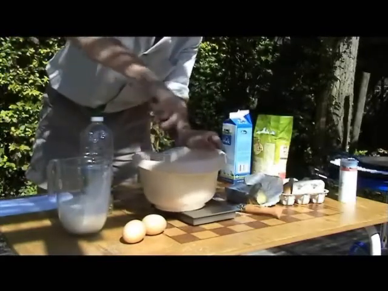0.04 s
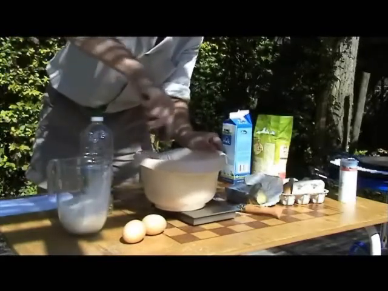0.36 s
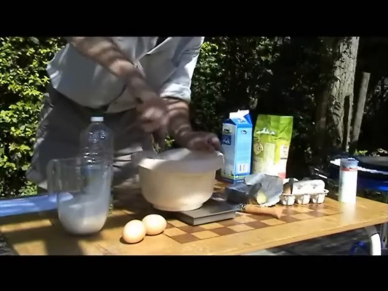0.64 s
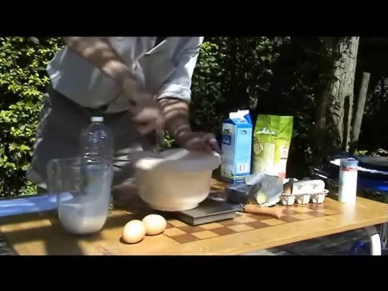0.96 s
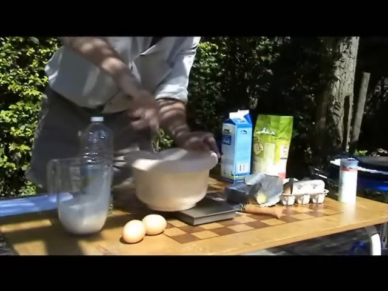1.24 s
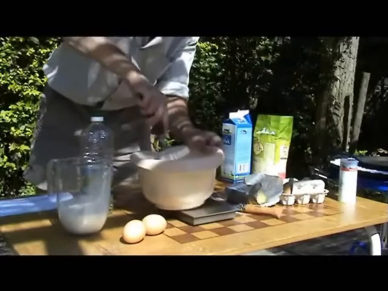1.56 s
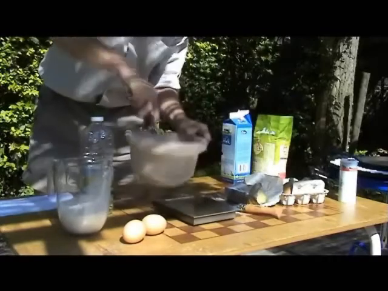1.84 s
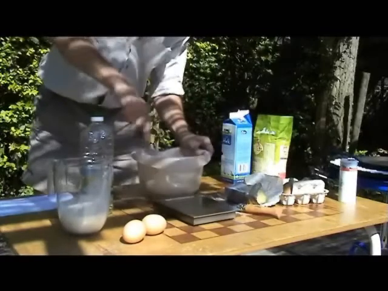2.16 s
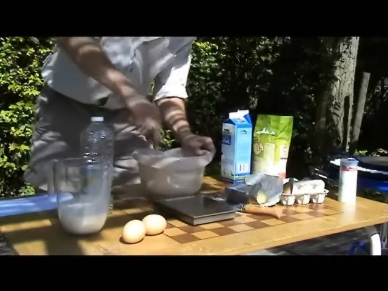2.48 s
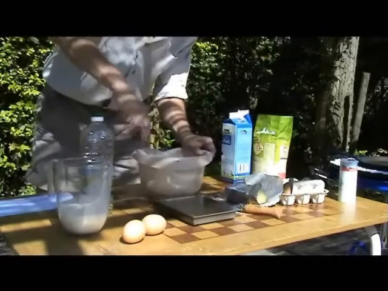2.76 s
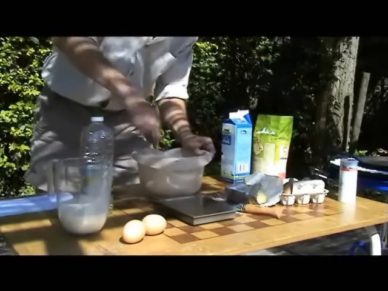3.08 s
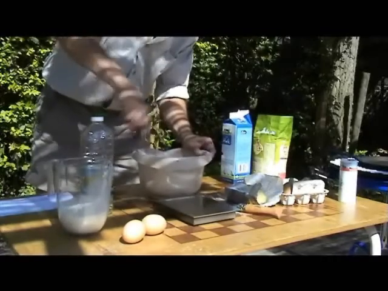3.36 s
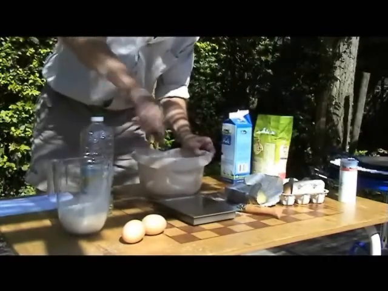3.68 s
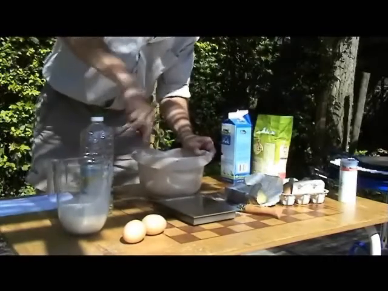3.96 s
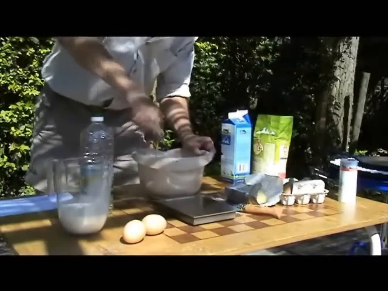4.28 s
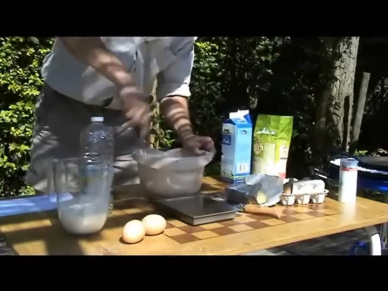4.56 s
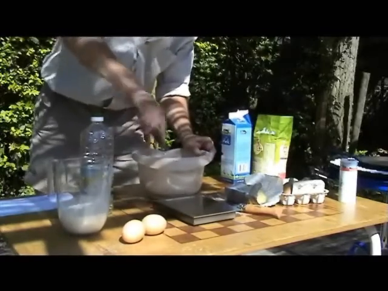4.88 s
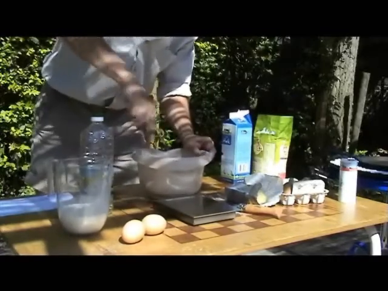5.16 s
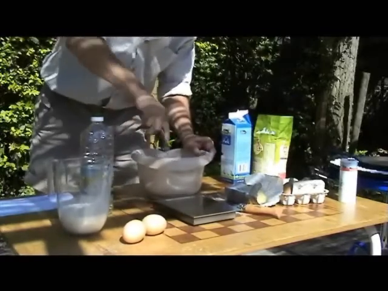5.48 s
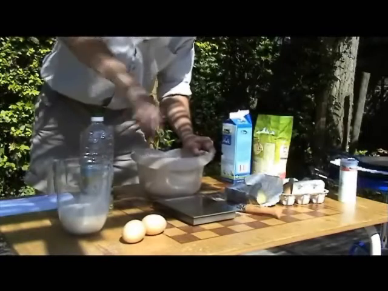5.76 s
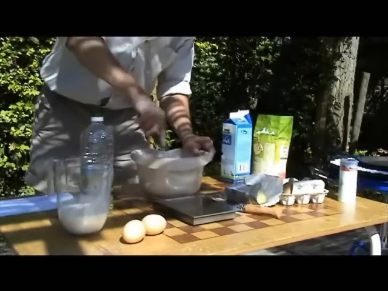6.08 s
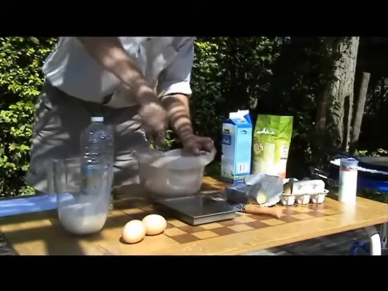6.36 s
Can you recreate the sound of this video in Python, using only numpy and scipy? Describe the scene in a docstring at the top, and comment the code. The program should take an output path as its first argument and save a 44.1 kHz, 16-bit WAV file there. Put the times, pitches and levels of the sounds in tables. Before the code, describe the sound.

A wire whisk is already beating batter in a plastic bowl, close to the microphone. After an opening clack, the wires rub and judder on the wall from 0.5 to 1 second. A loud hollow knock at 1.1 seconds starts a flurry of clacks, taps and soft wet slops lasting until 1.6. A high rising squeak comes at 1.9, then the bowl knocks twice at about 2.2 and 2.3. From 2.8 to 4.5 seconds uneven clacks mix with short high squeaks, with another knock and small slops near 3.8. Light ticks and tiny chirps follow around 4.9, a brief rub at 5.6, and firmer strokes at 5.2, 5.8 and 6.1, ending with a tap and a weak knock near 6.6. The loudest hits overload slightly. Every sound leaves a soft diffuse tail over faint, steady outdoor air.

```python
"""A wire whisk beats batter by hand in a plastic bowl, close to an overloading microphone.
Impacts of the wires make the wall clack in uneven strokes; stick-slip friction makes them squeak and
judder as they drag along it, and clouds of resonating bubbles slop in the batter. Now and then the
bowl knocks hollowly in its normal modes. Every sound leaves a soft diffuse tail in the yard."""
import sys
import numpy as np
from scipy import signal
from scipy.fft import rfft, irfft, next_fast_len
from scipy.io import wavfile
from scipy.ndimage import uniform_filter1d

SR = 44100
rng = np.random.default_rng(int(sys.argv[2]) if len(sys.argv) > 2 else 0)


def dump_mix(stems):
    """Bounce the given channels to the path in sys.argv[1] as a 16-bit WAV at rate SR."""
    frames = np.atleast_2d(stems).T  # one column per channel
    limited = np.clip(frames, -1, 1)  # hard clip at full scale
    pcm = np.round(limited * 32767).astype(np.int16)
    wavfile.write(sys.argv[1], SR, pcm)


N = 291942
LEAD = SR // 4   # the whisking is already under way at time zero
TIME = np.arange(-LEAD, N) / SR
SIZE = len(TIME)


def from_db(db):
    return 10 ** (np.asarray(db) / 20)


def unit_rms(x):
    return x / np.sqrt(np.mean(x ** 2) + 1e-20)


def white():
    return rng.standard_normal(SIZE)


def filtered(x, kind, hz, order=2):
    """Maximally flat filter: low-pass, high-pass or band-pass."""
    sections = signal.butter(order, np.clip(hz, 10, .45 * SR), kind, fs=SR, output="sos")
    return signal.sosfilt(sections, x + 1e-18)


def coloured(x, points):
    """Spectral shaping by a gain curve through (Hz, dB) points, interpolated in log frequency."""
    hz, db = np.transpose(points)
    size = next_fast_len(len(x), True)
    bins_hz = np.maximum(np.fft.rfftfreq(size, 1 / SR), 1)
    gain = from_db(np.interp(np.log(bins_hz), np.log(hz), db))
    return irfft(rfft(x, size) * gain, size)[:len(x)]


def drift(rate_hz):
    """Random modulation: low-pass noise of unit rms."""
    step = 8
    slow = unit_rms(filtered(rng.standard_normal(SIZE // step + 2), "low", step * rate_hz))
    return np.interp(np.arange(SIZE) / step, np.arange(len(slow)), slow)


def mode(force, hz, t60_s):
    """Damped harmonic oscillator: a unit impulse starts a decaying sine of height 1."""
    decay, angle = from_db(-60 / (t60_s * SR)), 2 * np.pi * hz / SR
    return signal.lfilter([0, np.sin(angle)], [1, -2 * decay * np.cos(angle), decay ** 2], force + 1e-18)


def add(track, at, sound):
    """Superposition: mixes a sound into a track from sample `at` on."""
    track[at:at + len(sound)] += sound[:SIZE - at]


def latest_event(rows):
    """Sample and hold: the age of the latest event at every moment, then its other columns."""
    starts_s, *columns = np.transpose(rows)
    latest = np.maximum(np.searchsorted(starts_s, TIME) - 1, 0)
    return [TIME - starts_s[latest]] + [column[latest] for column in columns]


def contact(start_s, hold_s, release_s, attack_s=0.0011):
    """First sample and envelope of a contact force: quick rise, hold, exponential decay."""
    t = np.arange(SR // 8) / SR
    envelope = (1 - np.exp(-t / attack_s)) * np.exp(-np.maximum(t - hold_s, 0) / release_s)
    return LEAD + round(start_s * SR), envelope


def drag(age_s, rise_s, hold_s, swell_power, fade_db_per_s, edge_s):
    """Speed (0-1) and strength of sliding friction, which swells as a power of speed, holds and fades."""
    speed = np.clip(age_s / rise_s, 0, 1)
    fade = from_db(-fade_db_per_s * np.maximum(age_s - rise_s - hold_s, 0))
    return speed, uniform_filter1d(speed ** swell_power * fade, int(edge_s * SR) + 1)


def still_air(level_db=-45):
    """Ambient noise: a steady broadband floor, strongest in the low middle range."""
    # spectrum of the air: frequency_hz, relative_density_db
    air_spectrum = [(30, -9), (100, -10.5), (180, 2.5), (500, 2.5), (1200, 1.5), (3000, -1), (6000, -6.5),
                    (10500, -12), (12500, -40)]
    return from_db(level_db) * unit_rms(coloured(white(), air_spectrum))


def yard_tail(x, high_t60_s=0.95, low_t60_s=0.98, split_hz=450, build_s=0.0023, blur_hz=220):
    """Diffuse reverberation: convolution with decaying noise that lasts longest in the bass."""
    # colour of the reverberation: frequency_hz, gain_db
    tail_spectrum = [(40, -23), (120, -8.5), (220, -3.5), (600, 2.5), (1300, 0), (3200, -1), (4400, 3),
                     (6800, 1.5), (10500, 2), (12500, -11.5)]
    # random modulation blurs the pitch, so that no tone rings on
    analytic = signal.hilbert(x, next_fast_len(SIZE))[:SIZE]
    blurred = np.real(analytic * (drift(blur_hz) + 1j * drift(blur_hz))) / np.sqrt(2)
    t = np.arange(3 * SR // 2) / SR
    noise = coloured(rng.standard_normal(len(t)), tail_spectrum)
    bass = filtered(noise, "low", split_hz, order=1)
    response = bass * from_db(-60 * t / low_t60_s) + (noise - bass) * from_db(-60 * t / high_t60_s)
    response *= 1 - np.exp(-t / build_s)
    return signal.fftconvolve(blurred, response / np.sqrt(SR / 20))[:SIZE]


def batter_slops(bubbles_per_s=3000, ring_cycles=20, spread_octaves=0.442, fall_octaves=0.096,
                 size_spread_db=3, spray_db=-15):
    """Bubble resonance: clouds of tiny bubbles open softly and ring; big low ones tend to come last."""
    # batter slopping off the wires: peak_s, half_length_s, level_db, pitch_hz
    slops = [(-.05, 0.022, -20, 1970), (1.122, .031, -18, 1710), (1.274, 0.045, -25, 1376),
             (1.563, 0.05, -28.5, 1392), (2.359, 0.073, -26.5, 2425), (3.861, .036, -19.5, 1947),
             (3.964, 0.025, -20, 2530), (4.113, .06, -36, 2155), (4.472, .027, -28, 1580),
             (5.016, 0.029, -33.5, 3100), (5.345, 0.026, -26.5, 1950), (5.919, 0.017, -21.5, 2115),
             (6.193, 0.024, -21, 2002)]
    # each slop is followed by a weaker, longer backwash
    backwash = [(peak_s + 0.05, 1.6 * half_s, db - 10, hz) for peak_s, half_s, db, hz in slops]
    out, t = np.zeros(SIZE), np.arange(SR // 80) / SR
    for peak_s, half_s, level_db, pitch_hz in slops + backwash:
        count = int(2 * half_s * bubbles_per_s) + 1
        lateness, detune, size = rng.standard_normal((count, 3)).T
        octaves = spread_octaves * detune - fall_octaves * lateness
        bubble_hz = np.clip(pitch_hz * 2 ** octaves, 300, 10000)[:, None]
        damping = np.log(1000) * bubble_hz * t / ring_cycles
        amplitudes = from_db(size_spread_db * size - lateness ** 2)[:, None]
        bubbles = amplitudes * np.sin(2 * np.pi * bubble_hz * t) * damping * np.exp(-damping)
        starts = np.maximum(LEAD + ((peak_s + .75 * half_s * lateness) * SR).astype(int), 0)
        samples = starts[:, None] - starts.min() + np.arange(len(t))
        cloud = np.bincount(samples.ravel(), bubbles.ravel())
        cloud *= np.sqrt(2 * half_s * SR / np.sum(cloud ** 2))   # unit power over the slop's length
        add(out, starts.min(), from_db(level_db) * cloud)
    # the bursting films throw off a fine spray
    spray = out * unit_rms(filtered(white(), "band", [2250, 9000], order=1))
    return filtered(out + from_db(spray_db) * spray, "high", hz=600)


def wall_rubs(slips_per_s=125, low_hz=1335, low_t60_s=0.0057, high_hz=2050, high_t60_s=0.018,
              hiss_db=-25):
    """Stick-slip friction: uneven slips excite two damped wall modes; a fine hiss pulses with them."""
    # slow rubs on the wall: start_s, rise_s, hold_s, level_db, upper_mode_db
    rubs = [(.516, 0.053, 0.034, -18, -45), (.838, 0.0096, 0.0018, -10.5, -30),
            (.857, 0.018, 0.033, -14.5, -10), (.925, 0.011, .012, -29, -0.5),
            (.985, 0.01, 0.0087, -32.5, -3), (4.757, 0.0056, 0.024, -38.5, 12),
            (5.622, 0.0039, 0.023, -25, -3.5), (5.695, 0.014, 0.019, -39, 5)]
    # spectrum of a slip's hiss: frequency_hz, relative_density_db
    hiss_spectrum = [(300, -2), (2400, -56), (3400, 10), (4500, -5), (7800, 1), (8700, 8), (9700, -8),
                     (11000, 8.5), (13000, -62)]
    age_s, rise_s, hold_s, level_db, upper_mode_db = latest_event(rubs)
    _, strength = drag(age_s, rise_s, hold_s, swell_power=0.62, fade_db_per_s=1300, edge_s=0.0032)
    slip_count = np.floor(np.cumsum(slips_per_s * from_db(6.5 * drift(80))) / SR)
    force = np.diff(slip_count, prepend=0) * from_db(2.0 * white()) + 0.093 * white()
    low = unit_rms(filtered(mode(force, low_hz, low_t60_s), "band", [0.932 * low_hz, 1.03 * low_hz]))
    high = unit_rms(filtered(mode(force, high_hz, high_t60_s), "band", [0.87 * high_hz, 1.01 * high_hz]))
    hiss = from_db(hiss_db) * unit_rms(coloured(white() * np.abs(low), hiss_spectrum))
    return strength * from_db(level_db) * (low + from_db(upper_mode_db) * high + hiss)


def squeal(hz, jitter, flutter_db=3.5):
    """Self-excited oscillation of a rubbed wire: pitch and strength waver with every catch."""
    phase = 2 * np.pi * np.cumsum(hz * (1 + jitter * drift(264.3))) / SR
    return unit_rms(np.sin(phase) * from_db(flutter_db * drift(260)))


def wire_chirps():
    """Brief frictional oscillation: one wire catches for a moment."""
    # catches of a single wire: start_s, hold_s, pitch_hz, level_db
    chirps = [(0.539, 0.062, 2810, -39.5), (4.76, 0.023, 2930, -22.5), (4.917, 0.0066, 3387, -14),
              (4.92, 0.0031, 2460, -19.5), (5.141, 0.0056, 4050, -22), (6.521, 0.021, 2890, -34.5)]
    out = np.zeros(SIZE)
    for start_s, hold_s, pitch_hz, level_db in chirps:
        at, envelope = contact(start_s, hold_s, release_s=0.0033)
        add(out, at, from_db(level_db) * envelope * squeal(pitch_hz, jitter=0.023)[:len(envelope)])
    return out


def wire_squeaks(jitter=0.03, overtone_jitter=.022, slow_jitter=0.043, scrape_db=-22, sag_s=.065):
    """Friction-driven vibration: wires squeal over a faint scrape, rising in pitch as they speed up."""
    # drags on the wall: start_s, rise_s, hold_s, top_hz, glide_octaves, sag_hz_per_s, level_db
    squeaks = [(1.382, 0.0023, 0.0053, 3090, .03, -4, -7.5), (1.426, .024, 0.0066, 3220, .25, 3.5, -5.5),
               (1.88, .045, 0.045, 3085, 0.34, 98, 0.5), (2.838, 0.035, 0.037, 3040, .3, 601, -5.5),
               (3.002, 0.0054, .012, 3430, .02, 997, -20), (3.143, .006, 0.019, 3590, .02, 6494, -6),
               (3.24, .045, 0.041, 3687, 0.77, 6991, -13.5), (3.335, 0.032, 0.029, 3280, .42, 2511, -14.5),
               (3.472, 0.089, 0.046, 3290, .48, 1998.5, -0.5), (4.3, 0.06, 0.061, 3383, .45, 594, -2.5)]
    # main partials of the wires: pitch_ratio, level_db
    partials = [(1, -6.5), (1.131, -13.5)]
    # their weaker overtones: pitch_ratio, level_db
    overtones = [(1.678, -19), (2.16, -30.5), (2.872, -34.5)]
    # response of the wires to overtones and friction noise: frequency_hz, gain_db
    steel_response = [(150, 1), (600, 1.5), (1000, 9.5), (1500, 5), (3300, -15), (4300, 8), (4800, -5),
                      (5400, -14), (6000, -1.5), (6800, 6.5), (7800, 1.5), (9000, 6), (10000, -1),
                      (13000, -6)]
    age_s, rise_s, hold_s, top_hz, glide_octaves, sag_hz_per_s, level_db = latest_event(squeaks)
    speed, strength = drag(age_s, rise_s, hold_s, swell_power=1.36, fade_db_per_s=352, edge_s=0.005)
    hz = top_hz * 2 ** (glide_octaves * (speed ** 2 - 1))
    hz -= sag_hz_per_s * np.clip(age_s - rise_s, 0, sag_s)
    stutter = slow_jitter * (1 - speed)   # a slow wire catches less regularly
    tone = sum(from_db(db) * squeal(ratio * hz, jitter + stutter) for ratio, db in partials)
    upper = sum(from_db(db) * squeal(ratio * hz, overtone_jitter + stutter) for ratio, db in overtones)
    scrape = from_db(scrape_db) * white()
    return strength * from_db(level_db) * (tone + coloured(upper + scrape, steel_response))


def bowl_knocks(judder_db=-27):
    """Normal modes: the bumped bowl judders and rings; a hand on the rim may mute the lowest mode."""
    # blows to the whole bowl: start_s, level_db, lowest_mode_db, judder_s
    knocks = [(-.025, -8.5, -29, 0.0094), (1.081, 4, -18, 0.0026), (2.157, -1.5, 1, 0.023),
              (2.272, 1.5, -10, 0.013), (3.819, -3.5, -24, 0.0041), (6.583, -13, -18, 0.011)]
    # modes of the bowl: frequency_hz, level_db, t60_s
    bowl_modes = [(297, -3, 0.098), (453, -23, 0.13), (518.9, -7, 0.081), (586.4, 1.5, 0.063),
                  (664, -11, 0.1), (817, -23.5, 0.16), (982, -24, 0.22), (1330, -50, 0.1799),
                  (1750, -39, 0.073), (1935, -16, 0.054)]
    out = np.zeros(SIZE)
    for start_s, level_db, lowest_mode_db, judder_s in knocks:
        at, envelope = contact(start_s, hold_s=0, release_s=judder_s)
        for k, (hz, mode_db, t60_s) in enumerate(bowl_modes):
            judder = from_db(judder_db) * envelope * rng.standard_normal(len(envelope))
            force = np.pad(judder, (0, SR // 8))
            force[0] = 1   # the blow itself
            gain = from_db(level_db + mode_db + lowest_mode_db * (k == 0)) * (-1) ** k
            add(out, at, gain * mode(force, hz, t60_s))
    return filtered(out, "high", 147, order=3)


def wire_impacts(tap_s=0.0005, late_stretch=1.34, late_tips_db=-4):
    """Impact train of the wires on the wall, in order: start_s, contact_s, level_db, depth_db, tips_db."""
    # light taps of a single wire, and the sharp cracks of the bowl knocks at 2.16 and 2.27 s: start_s,
    # level_db, depth_db
    taps = [(1.272, -22, 5), (1.503, -9, 5), (1.527, -11, 5), (1.539, -3, -0.5), (1.589, -17, -14),
            (1.627, -13, -1), (2.1564, -18.5, 22), (2.2712, -3.5, 6.5), (4.886, -23, -39),
            (4.918, -13.5, -9), (4.947, -21, -29), (5.143, -22.5, -16), (5.438, -25.5, 7), (6.279, -11, -9)]
    # strokes, wire after wire: start_s, wire_count, gap_s, contact_s, first_db, last_db, depth_db
    strokes = [(-0.06, 2, 0.012, 0.013, -3.5, -10.5, 6), (1.0655, 3, .016, 0.0065, -8, 0.5, 7),
               (1.2235, 2, .006, 0.0084, -4.5, -9, 4), (1.286, 2, .007, 0.0038, 1, -6, 8),
               (1.385, 2, .014, 0.035, -17.5, -33, 3), (2.833, 2, .008, .008, 0, -21, -0.5),
               (3.096, 3, .018, 0.012, -1.5, -3, -3), (3.4191, 2, 0.018, 0.0063, -3, -5.5, -4.5),
               (3.781, 2, .012, 0.01, -7.5, -8, -0.5), (4.344, 3, .016, 0.018, -5, -12, 2.5),
               (5.214, 4, .018, 0.0096, -2.5, -9, 6), (5.821, 2, .013, .012, -4, -9.5, -1),
               (6.111, 2, .012, 0.01, -1, -2, -5.5), (6.581, 2, 0.011, 0.011, -18, -18, -30)]
    impacts = [(start_s, tap_s, level_db, depth_db, 0) for start_s, level_db, depth_db in taps]
    for start_s, wire_count, gap_s, contact_s, first_db, last_db, depth_db in strokes:
        impacts.append((start_s, contact_s, first_db, depth_db, 0))
        # later wires drag: longer contact, duller tips
        for k, db in enumerate(np.linspace(first_db, last_db, round(wire_count))[1:], 1):
            impacts.append((start_s + k * gap_s, late_stretch * contact_s, db, depth_db, late_tips_db))
    return sorted(impacts)


def wet_resonance(starts_s, low_hz, high_hz, width_hz=160, sag=.4, sag_s=.003):
    """Mass loading: a resonance, pitched anew at each impact, sinks quickly as the batter loads it."""
    centres_hz = low_hz * (high_hz / low_hz) ** rng.beta(2, 2, len(starts_s))
    age_s, centre_hz = latest_event(np.column_stack([starts_s, centres_hz]))
    hz = centre_hz * (1 + sag * np.exp(-np.abs(age_s) / sag_s))
    phase = 2 * np.pi * np.cumsum(hz) / SR
    return unit_rms(drift(width_hz) * np.cos(phase) + drift(width_hz) * np.sin(phase))


def noise_band(low_hz, high_hz):
    """Band-limited noise of unit rms."""
    return unit_rms(filtered(white(), "band", [low_hz, high_hz]))


def whisk_clacks(graze_db=-22, graze_s=0.013, splash_db=-2, sizzle_db=-11, thud_db=-26, grain_db=3):
    """Impact excitation: wet wires stir four bands of bowl and whisk; deep hits stir the bowl more."""
    # bands of the bowl body, bowl wall, wires and wire tips: low_hz, high_hz, level_db, db_per_depth_db
    bands = [(400, 1600, -27, 1.46), (908.6, 1500, -9, 1), (1744, 3200, -1, 0), (3613, 6000, -7.5, 0.11)]
    _, _, band_db, db_per_depth_db = np.transpose(bands)
    impacts = wire_impacts()
    # the outer wires graze the wall just before the rest land
    graze = from_db(graze_db) * np.linspace(0, 1, int(graze_s * SR))
    powers = np.zeros((len(bands), SIZE))
    for start_s, contact_s, level_db, depth_db, tips_db in impacts:
        # brief ticks die fastest
        at, landing = contact(start_s, hold_s=0.29 * contact_s, release_s=0.006 + 0.34 * contact_s)
        envelope = np.concatenate([graze, landing])
        levels_db = level_db + band_db + db_per_depth_db * depth_db
        levels_db[-1] += tips_db
        for power, db in zip(powers, levels_db):
            add(power, at - len(graze), (from_db(db) * envelope) ** 2)
    forces = np.sqrt(powers)   # incoherent impacts add in power
    starts_s = np.array(impacts)[:, 0]
    out = np.zeros(SIZE)
    for force, (low_hz, high_hz, _, _) in zip(forces, bands):
        splash = from_db(splash_db) * noise_band(low_hz, high_hz)
        out += force * unit_rms(splash + wet_resonance(starts_s, low_hz, high_hz))
    _, wall_force, _, tip_force = forces
    out += tip_force * from_db(sizzle_db) * noise_band(7011, 10003.5)
    out += wall_force * from_db(thud_db) * noise_band(170, 450)
    return out * from_db(grain_db * drift(446))


def scene(slop_db=-1, tail_db=-16, rub_tail_db=4):
    """Superposition of the bowl's direct sound, its reverberation and the still air."""
    beating = whisk_clacks() + bowl_knocks() + wire_squeaks() + from_db(slop_db) * batter_slops()
    rubs_and_chirps = wall_rubs() + wire_chirps()
    # the quiet rubs and chirps have a stronger diffuse tail
    tail = from_db(tail_db) * yard_tail(beating + from_db(rub_tail_db) * rubs_and_chirps)
    return (beating + rubs_and_chirps + tail + still_air())[None, LEAD:]


def record(dry, microphone_hz=11900, stopband_hz=16800):
    """Hard clipping: the microphone loses the top treble and flattens loud peaks; a low-pass follows."""
    clipped = np.clip(filtered(dry, "low", microphone_hz, order=16), -1, 1)
    return signal.sosfilt(signal.cheby2(20, 70, stopband_hz, fs=SR, output="sos"), clipped)


dry = scene()
out = record(dry)
dump_mix(out)
```